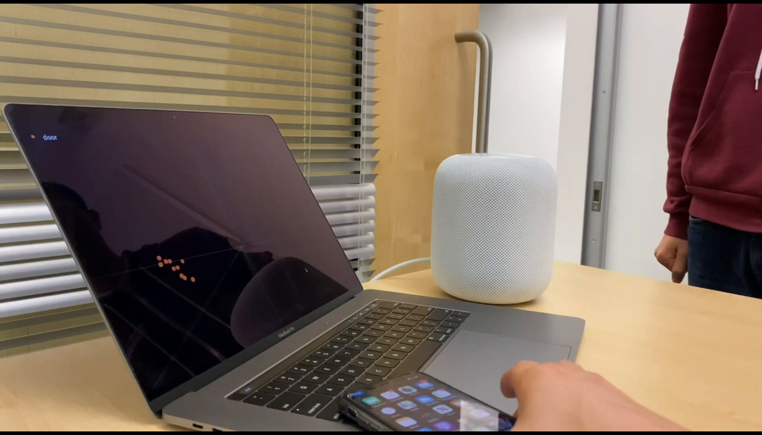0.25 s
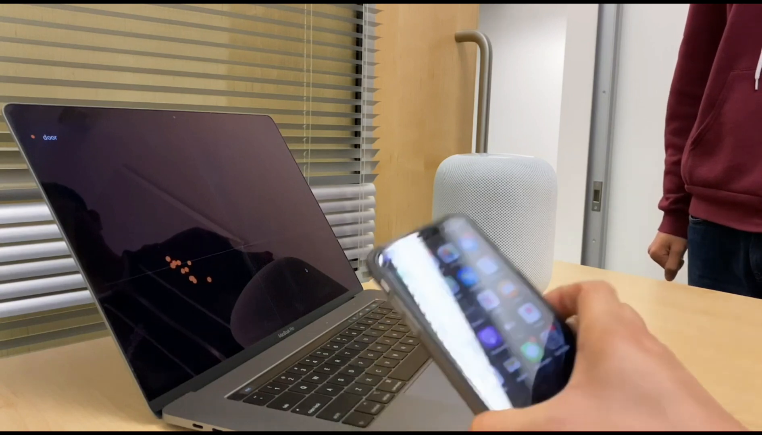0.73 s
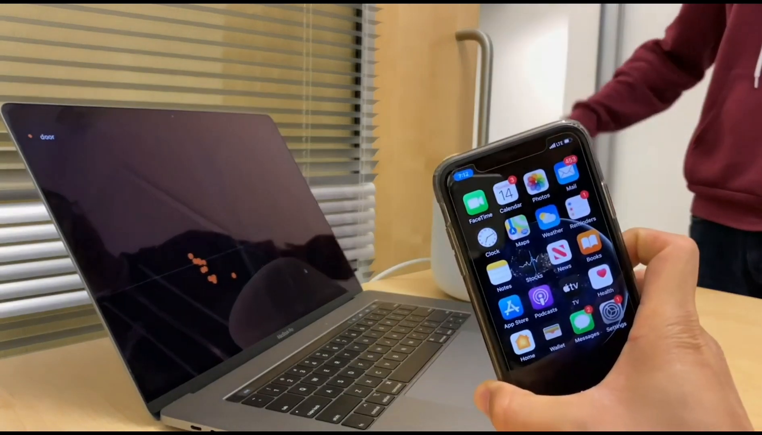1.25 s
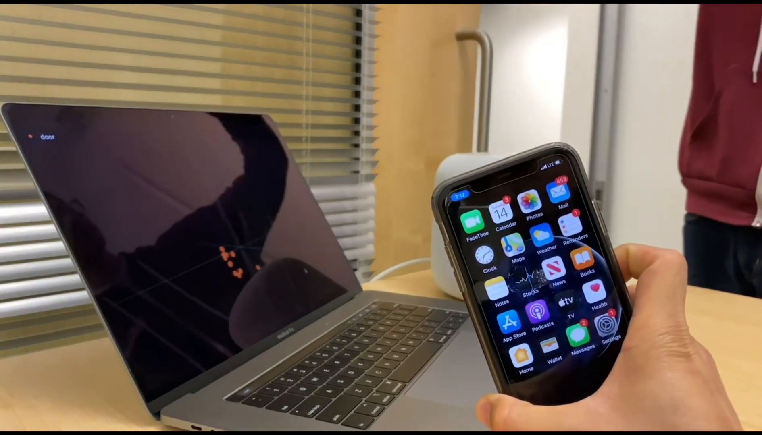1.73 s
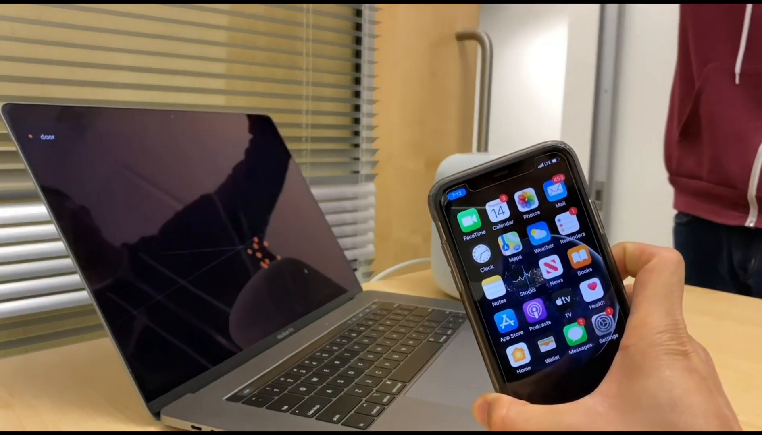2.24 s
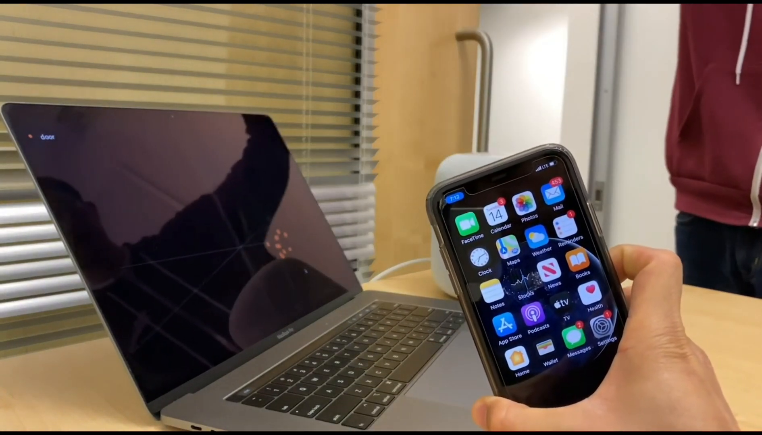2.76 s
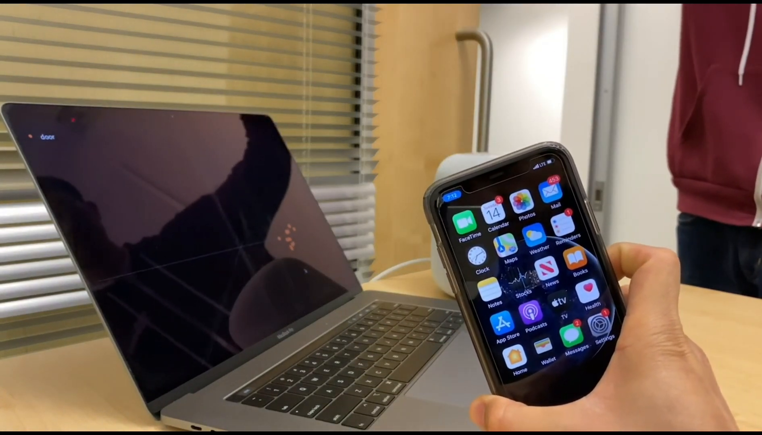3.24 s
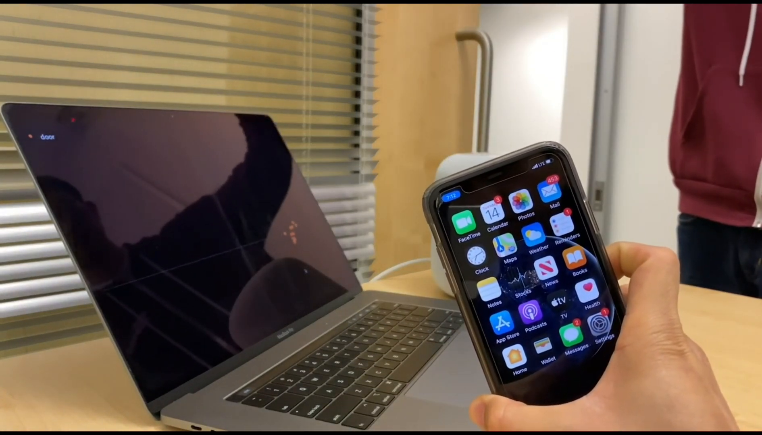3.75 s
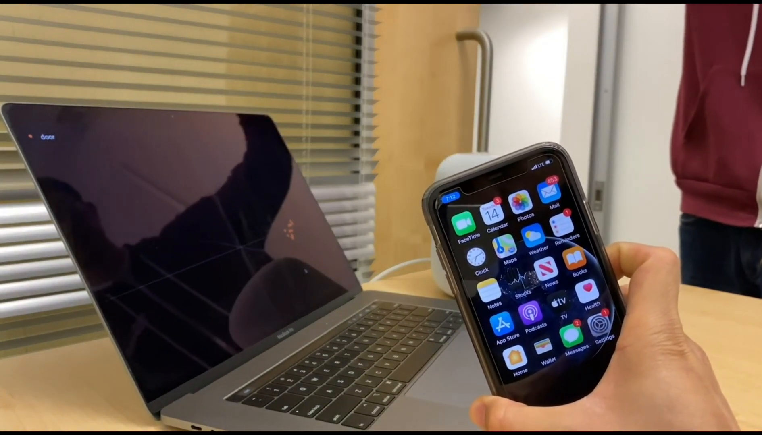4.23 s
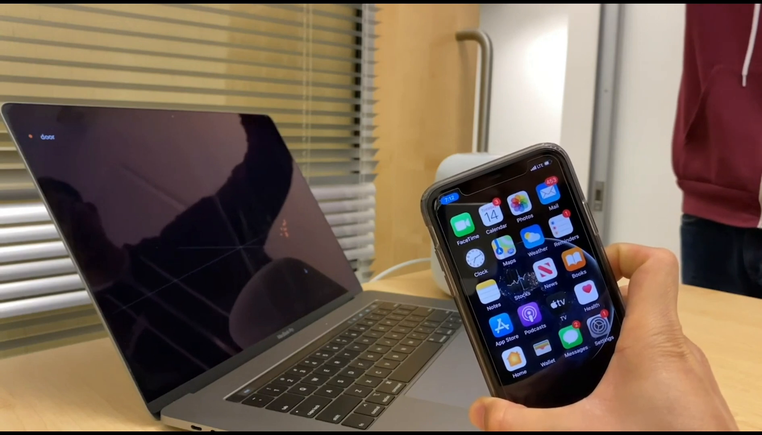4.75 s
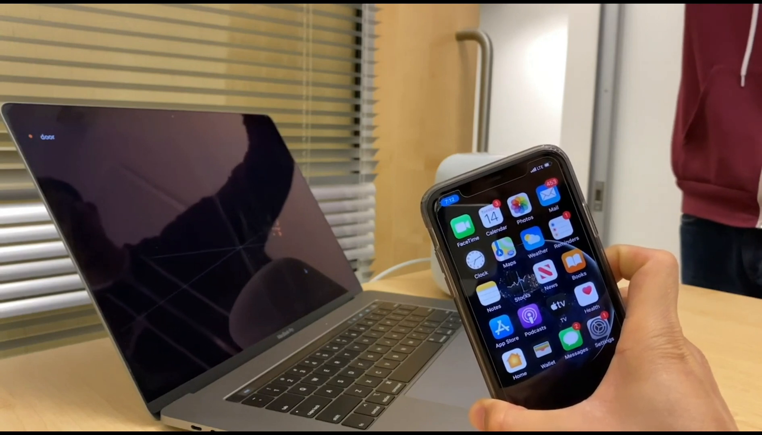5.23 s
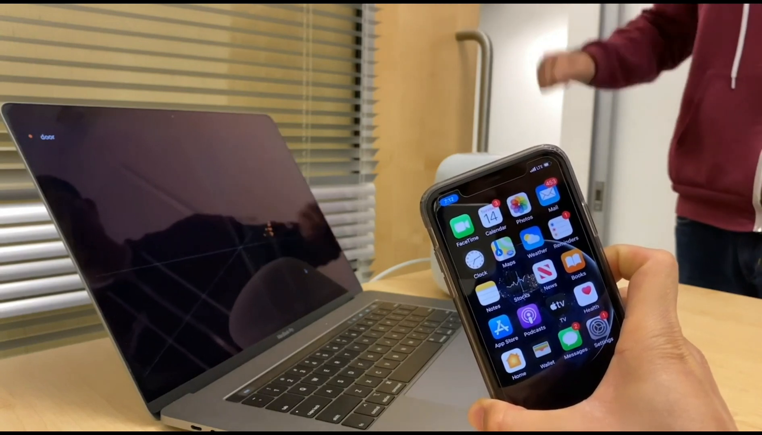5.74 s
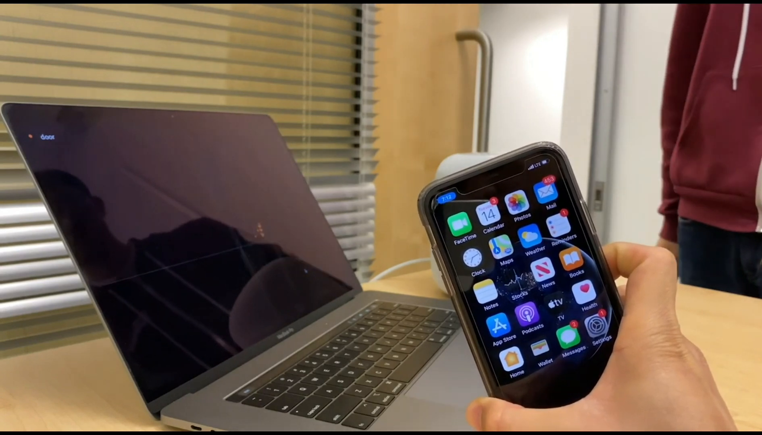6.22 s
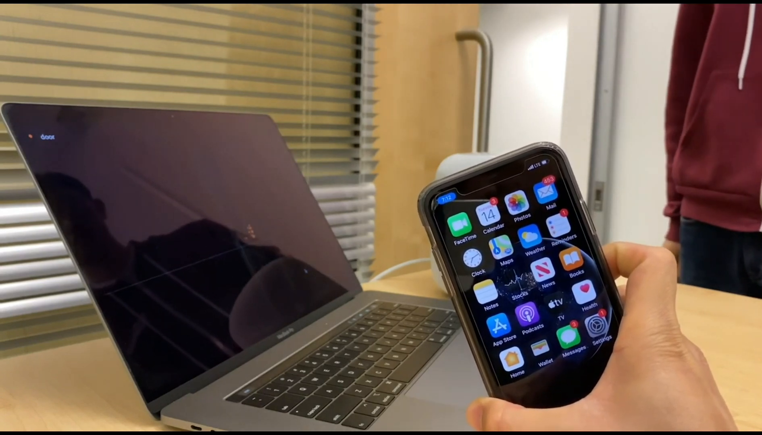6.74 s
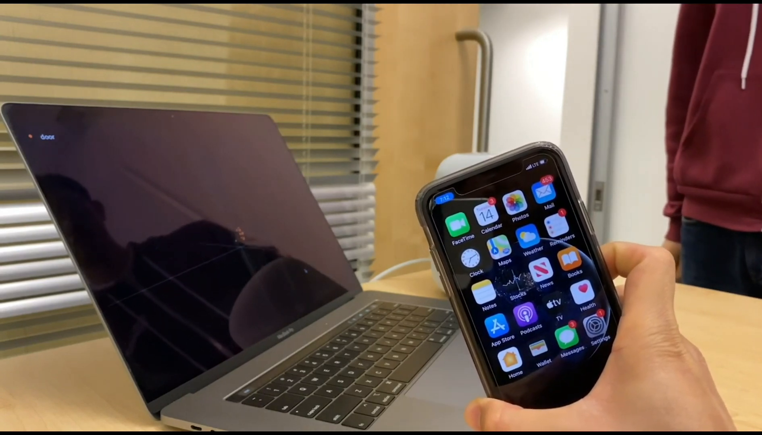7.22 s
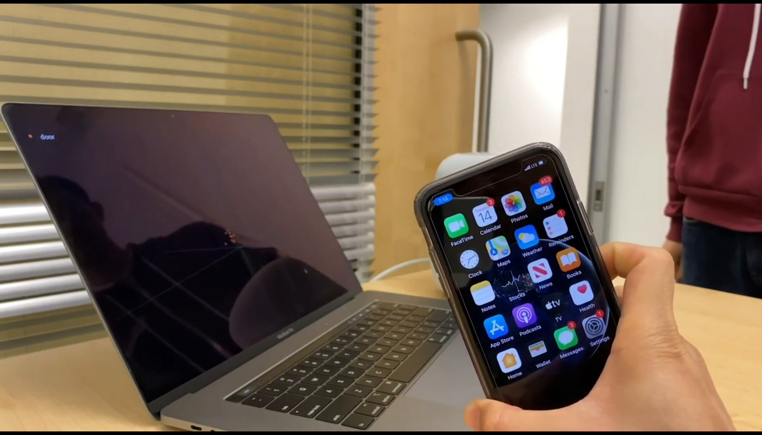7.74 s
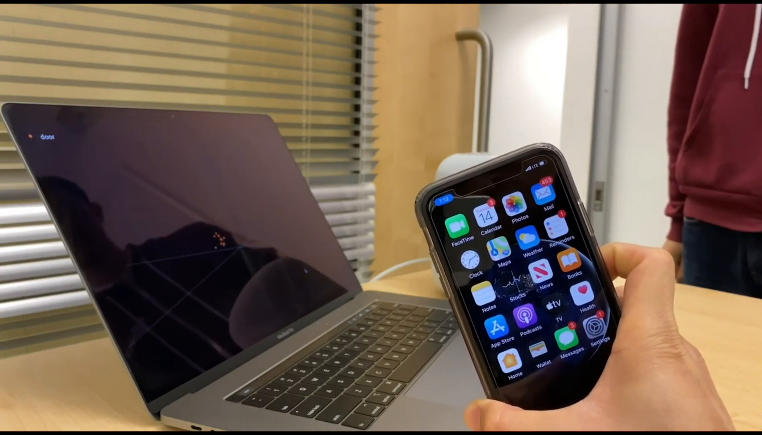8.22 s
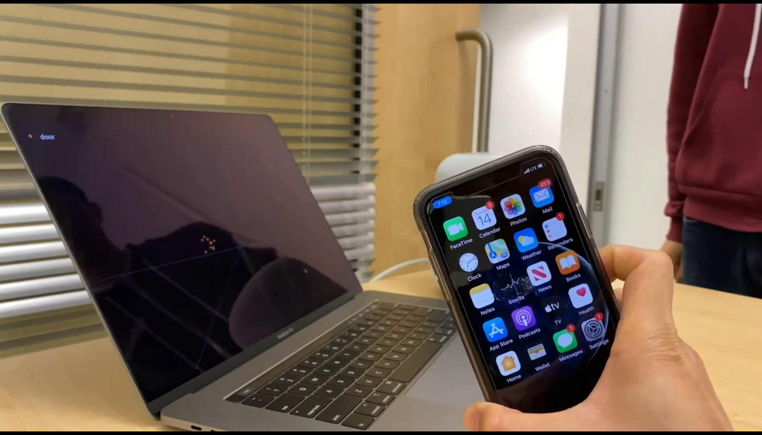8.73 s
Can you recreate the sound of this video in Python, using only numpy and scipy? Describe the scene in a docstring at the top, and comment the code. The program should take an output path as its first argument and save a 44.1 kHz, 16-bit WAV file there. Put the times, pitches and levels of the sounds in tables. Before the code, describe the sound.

After two light taps of a phone against a laptop, someone knocks hard on a wooden door seven times while ventilation hums.

```python
"""Seven loud knuckle knocks sound on a wooden door in a small office, overloading the microphone.
Each blow makes the wood crack and ring and the room echo; two of them also rattle the latch.
Before the knocks, a phone is picked up from a laptop with two light taps and a soft sleeve rustle.
Ventilation rumbles, hisses and hums throughout."""
import sys
import numpy as np
from scipy import signal
from scipy.fft import irfft
from scipy.io import wavfile

SR = 44100
rng = np.random.default_rng(int(sys.argv[2]) if len(sys.argv) > 2 else 0)


def store_wav(level_fs):
    """Save 16-bit WAV to argv[1]."""
    pcm = np.round(np.clip(np.atleast_2d(level_fs), -1, 1) * 32767)
    wavfile.write(sys.argv[1], SR, pcm.T.astype(np.int16))


N = 395594
RING_TIME = np.arange(SR) / SR  # one second for a sound to die away in
SIDES = np.array([[.5], [-.5]])  # splits a difference between left and right

# How long the office echoes: f/Hz, t60/s (the time to fade by 60 dB)
ROOM_FADE = [(80, 0.94), (300, 0.97), (700, 0.83), (1500, 0.81), (2800, 0.29), (7000, 0.064), (15000, .18)]
# How alike the room sounds on the left and right: f/Hz, correlation (1 = the same)
STEREO_LIKENESS = [(60, 1), (130, 0.56), (290, 0.69), (640, 0.13), (1400, 0.2), (3000, 0.15), (15000, 0.26)]


def knocking(ring_db=-1, crack_db=22.0, room_db=28, pan_db=1.5):
    """Each blow sets off a sharp crack, the ringing of the door and the echo of the room."""
    # The knocks: t/s, force/dB, contact cut-off/Hz, knuckle rap/dB, rap f/Hz, hand thud/dB
    knocks = [(2.3945, 2.46, 1075, 5, 1620, -11), (2.8270, 3.5, 1340, 3.5, 1270, -2.5),
              (3.2470, -7, 1540, 11, 1300, 3), (3.68, -4, 1220, -8, 1480, 4),
              (4.1605, 3, 1396, 4, 1304, -1), (4.6535, 1.34, 863, -7, 1480, 0.5),
              (5.156, -4.5, 1270, 8, 1670, 2.5)]
    # The crack, a crowd of door vibrations that die quickly: f/Hz, level/dB
    crack_colour = [(100, -21.5), (280, 2), (420, 0.5), (550, 2), (750, 1.5), (1000, 3), (1350, -2.5),
                    (1700, -8.5), (2300, -5.5), (3200, -24.5), (6000, -34.5), (15000, -24.5)]
    # The crack's paths, straight and off the desk and walls: delay/s, level/dB
    paths = [(0, 4), (.0034, -3.5), (0.014, 0), (0.0225, 0.5)]
    # The echo of the office: f/Hz, level/dB
    room_colour = [(70, -7.5), (170, -6.5), (280, -5.5), (520, -1.5), (720, -4), (900, -4), (1400, -10),
                   (1750, -13), (2300, -21), (3200, -22.5), (6000, -23), (15000, -21)]
    out = np.zeros((2, N))
    crack_and_room = from_db(room_db) * dying_noise(room_colour, ROOM_FADE, rise_s=0.0092)
    for delay, db in paths:
        crack = dying_noise(crack_colour, [(300, 0.013), (1200, 0.026), (4000, 0.033)], rise_s=0.0009)
        crack_and_room += from_db(crack_db + db) * np.roll(crack, int(delay * SR), axis=1)
    for s, force_db, contact_hz, rap_db, rap_hz, thud_db in knocks:
        force = from_db(force_db) * blow(contact_hz, rap_db, rap_hz, thud_db)
        response = crack_and_room + from_db(ring_db) * door_ring()
        add(out, s, signal.fftconvolve(response, force[None], axes=1))
    return out * from_db(pan_db * SIDES)


def blow(contact_hz, rap_db, rap_hz, thud_db, rap_q=3.75, thud_hz=340, thud_q=0.99):
    """The push of one knock: a softer contact is duller, bone adds a rap, the hand's weight a thud."""
    softness = signal.butter(2, contact_hz, fs=SR, output="sos")
    force = signal.sosfilt(softness, signal.unit_impulse(SR // 20))
    for db, hz, q in (rap_db, rap_hz, rap_q), (thud_db, thud_hz, thud_q):
        band = signal.lfilter(*signal.iirpeak(hz, q, fs=SR), force)
        force = force + (from_db(db) - 1) * band
    return force


def door_ring(spot_db=2.0, swell_cycles=1.87, travel_cycles=6.3, linger_db=-18):
    """The door's tones swell as bending waves fill the wood, then linger in the room."""
    # The door's natural tones: f/Hz, level/dB, t60/s, left minus right/dB
    door_tones = [(73.8, -24, 0.91, -0.5), (87.2, -24.5, 0.87, -1), (190.1, -22, .5, -2.5),
                  (228.3, -25.5, 0.52, -5), (264, -22, 0.18, 7.5), (285.7, -8.5, 0.043, 9),
                  (342, -22.5, 0.043, -9), (369, -25, 0.13, 10.5), (491.4, -22.5, 0.53, 5),
                  (562.3, -24.5, 0.28, 11), (623.7, -21.5, 0.25, 12), (676.6, -9.5, 0.11, 9),
                  (708, -8.5, 0.094, -2), (735, -14, 0.3, 1.5), (795, -16.5, 0.27, -2), (847, -21, 0.19, 2),
                  (845, -23.5, 0.18, 4.5), (957, -17.5, 0.28, 1.5), (986, -24, 0.25, -6),
                  (1040, -15, 0.067, 1), (1147, -22, 0.19, 4), (1225, -24.5, 0.041, -0.5),
                  (1224, -20.5, 0.13, -4.5), (1287, -18, 0.1, -4.5), (1323, -19, 0.13, -0.5),
                  (1386, -18, 0.056, 1), (1472, -19.5, 0.17, 4.5), (1580, -31.5, 0.41, 2.5),
                  (1754, -29.5, 0.12, -1), (2075, -18, 0.055, 6.5)]
    out = 0
    for hz, db, t60, pan_db in door_tones:
        swell = 1 - np.exp(-RING_TIME * hz / swell_cycles)
        # high bending waves cross the door first
        phase = 2 * np.pi * (hz * RING_TIME - travel_cycles * np.log(hz / 700))
        stereo_shift = np.arccos(at_hz(STEREO_LIKENESS, hz)) * SIDES
        direct = from_db(pan_db * SIDES) * fade(t60) * np.sin(phase + stereo_shift)
        room_level = from_db(linger_db) * fade(at_hz(ROOM_FADE, hz))
        lingering = room_level * np.sin(phase + 2 * np.pi * rng.random() - stereo_shift)
        # each spot on the door rings the tones a little differently
        strength = from_db(db + spot_db * rng.standard_normal())
        out = out + strength * swell * (direct + lingering)
    return out


def latch(t60=0.0056):
    """Short, dry, bright ticks as the door springs back against its latch."""
    # Rattles just after the fifth and seventh knocks: t/s, level/dB
    rattles = [(4.2035, -21), (5.203, -27)]
    out = np.zeros((2, N))
    colour = [(500, -20.5), (3000, 10), (6000, -8), (15000, -11.0)]
    tick = dying_noise(colour, [(1000, t60)], rise_s=.0003)
    for s, db in rattles:
        add(out, s, from_db(db) * tick)
    return out


def phone_taps(room_db=-1, edge_drop_db=6, case_db=-40):
    """The phone taps the laptop twice, ringing its case and the room."""
    # The phone touching the laptop: t/s, level/dB, centre f/Hz, width/octaves
    touches = [(0.199, -14, 2770, 0.56), (0.475, -22.5, 4960, 1.5)]
    # The natural tones of the laptop's case: f/Hz, level/dB, t60/s
    case_tones = [(2026, -2, 0.08), (3040, 9, 0.06), (3820, -2, 0.084)]
    out = np.zeros((2, N))
    hz = np.geomspace(100, 16000, 24)
    for s, db, centre_hz, octaves in touches:
        off_centre = np.log2(hz / centre_hz) / octaves
        colour = np.column_stack([hz, -edge_drop_db * off_centre ** 2])
        tap = dying_noise(colour, [(1000, 0.063), (10000, 0.027)], rise_s=.0004)
        tap += from_db(room_db) * dying_noise(colour, ROOM_FADE, rise_s=0.0078)
        for tone_hz, tone_db, t60 in case_tones:
            level = from_db(case_db + tone_db + at_hz(colour, tone_hz)) * fade(t60)
            tap += level * np.sin(2 * np.pi * (tone_hz * RING_TIME + rng.random((2, 1))))
        add(out, s, from_db(db) * tap)
    return out


def sleeve_rustle():
    """Cloth rubs as the arm moves, growing louder as it speeds up and softer as it slows."""
    # Arm movements: fastest moment t/s, level/dB, half length/s
    moves = [(0.0, -63, 0.076), (0.407, -67.5, 0.21), (.92, -63, 0.1), (1.423, -69.5, 0.15)]
    # Rubbing cloth: f/Hz, level/dB
    cloth_colour = [(600, 5), (2500, 11), (6000, -1.5), (8000, -9.5), (11000, -14), (15000, -26)]
    t = np.arange(N) / SR
    speed = sum(from_db(db) * np.exp(-((t - s) / half_s) ** 2 / 2) for s, db, half_s in moves)
    return speed * noise(cloth_colour)


def ventilation(rumble_db=-35.0, air_db=-54, waver=0.17, pan_db=1.8):
    """Fan and electrical hums waver slightly over the rumble of the duct and a soft hiss of air."""
    # The hums: f/Hz, level/dB
    hums = [(63.1, -35.5), (69.3, -49.5), (120, -36.5)]
    # The rumbling duct: f/Hz, level/dB
    rumble_colour = [(20, -11.5), (32, -5.5), (48, -7.5), (66, 2.5), (78, -2), (90, 0), (105, -3.5),
                     (140, -2), (170, -10.5), (225, -3.5), (300, -7.5), (360, -10.5), (420, -24.5),
                     (2000, -110)]
    # The hissing air: f/Hz, level/dB
    air_colour = [(200, -44.5), (450, -3), (600, -2), (850, -1), (1400, -6.5), (1650, -11.5), (2000, -12),
                  (3000, -20.5), (5000, -29), (7000, -33.5), (11000, -41.5), (12500, -52), (16000, -57.5)]
    t = np.arange(N) / SR
    out = from_db(rumble_db) * noise(rumble_colour) + from_db(air_db) * noise(air_colour)
    for hz, db in hums:
        swell, sway = noise([(1, 0), (3, -12), (12, -60), (30, -140)])  # slow random drifts
        tone = np.sin(2 * np.pi * (hz * t + rng.random()) + waver * sway[::-1])
        out += from_db(db) * np.sqrt(2) * (1 + waver * swell) * tone
    return out * from_db(pan_db * SIDES)


def dying_noise(colour, fade_times, rise_s):
    """A noise burst in third-octave bands, set by colour (f/Hz, level/dB) and fade_times (f/Hz, t60/s)."""
    out = 0
    edges = 60 * 2 ** (np.arange(25) / 3)
    rise = 1 - np.exp(-RING_TIME / rise_s)
    for low, high in zip(edges, edges[1:]):
        hz = np.sqrt(low * high)
        burst = rng.standard_normal((2, SR)) * (fade(at_hz(fade_times, hz)) + 1e-12) * rise
        mid, side = signal.sosfilt(signal.butter(2, [low, high], "band", fs=SR, output="sos"), burst)
        band = spread(mid, side, hz)
        band /= np.linalg.norm(band, axis=1, keepdims=True)  # same energy however long it rings
        out = out + band * from_db(at_hz(colour, hz)) * np.sqrt(2 * (high - low) / SR)
    return out


def noise(colour):
    """Steady stereo noise with an average (rms) level of 1, shaped by colour (f/Hz, level/dB)."""
    hz = np.fft.rfftfreq(N, 1 / SR)
    mid, side = np.exp(2j * np.pi * rng.random((2, len(hz))))
    sound = irfft(spread(mid, side, hz) * from_db(at_hz(colour, hz)), N)
    return sound / np.sqrt(np.mean(sound ** 2) + 1e-20)


def spread(mid, side, hz):
    """Blend two noises into left and right, most alike in the bass."""
    alike = at_hz(STEREO_LIKENESS, hz)
    return np.sqrt(1 + alike) * mid + np.sqrt(1 - alike) * side * np.array([[1], [-1]])


def fade(t60):
    """A level that falls by 60 dB every t60 seconds."""
    return from_db(-60 * RING_TIME / t60)


def from_db(db):
    """Turn decibels into a multiplier."""
    return 10 ** (np.asarray(db) / 20)


def at_hz(points, hz):
    """Read between a table's rows, with octaves evenly spaced."""
    known, values = np.transpose(points)
    return np.interp(np.log(np.maximum(hz, 1)), np.log(known), values)


def add(track, s, sound):
    """Mix a stereo sound in, starting at s seconds."""
    start = int(s * SR)
    track[:, start:start + sound.shape[1]] += sound[:, :N - start]


def scene():
    """Knocks and small sounds over the ventilation, which reaches the left microphone slightly later."""
    left, right = ventilation()
    late_left = np.interp(np.arange(N) - 9, np.arange(N), left)  # 9 samples late
    return knocking() + latch() + phone_taps() + sleeve_rustle() + np.array([late_left, right])


def record(dry):
    """The loudest peaks overload the microphone and crackle; the highest treble is cut."""
    cutoff_hz = 15800
    treble_cut = signal.ellip(10, .1, 80, cutoff_hz, fs=SR, output="sos")
    return signal.sosfilt(treble_cut, np.clip(dry, -1, 1))


dry = scene()
out = record(dry)
store_wav(out)
```